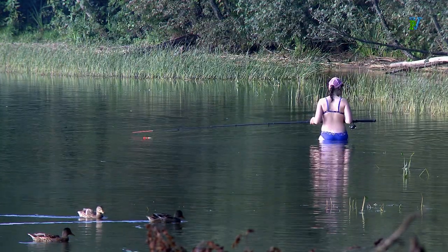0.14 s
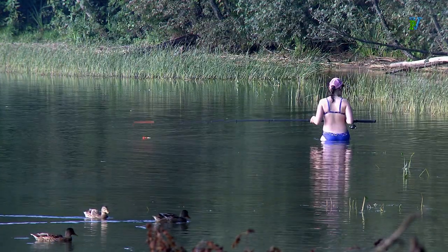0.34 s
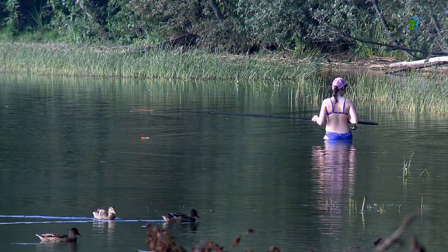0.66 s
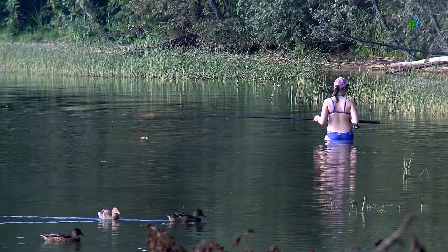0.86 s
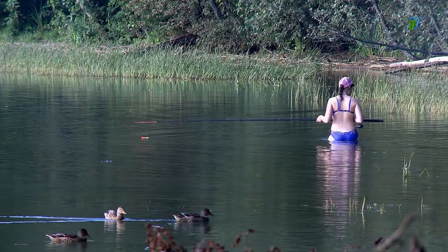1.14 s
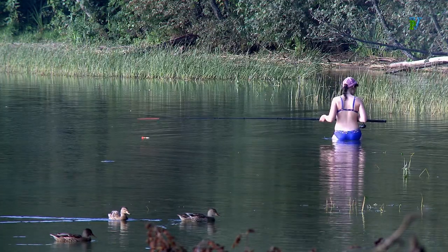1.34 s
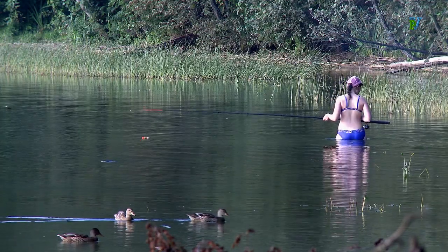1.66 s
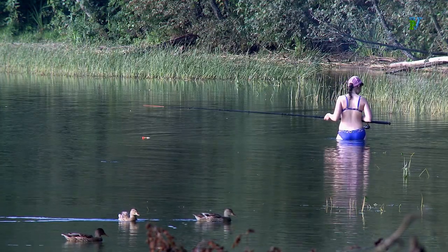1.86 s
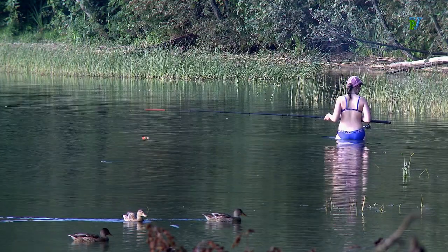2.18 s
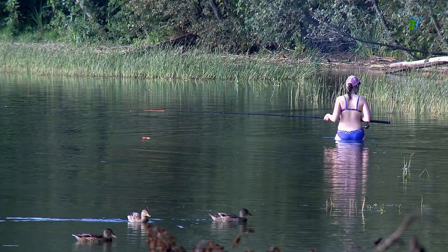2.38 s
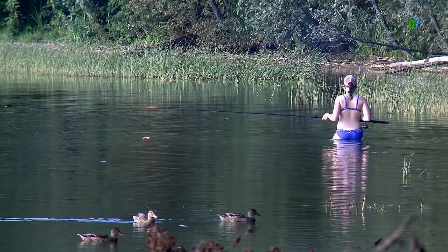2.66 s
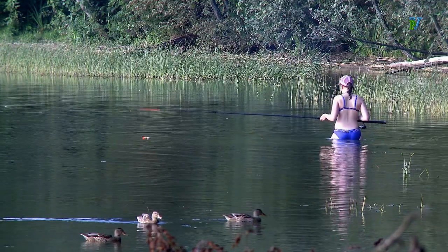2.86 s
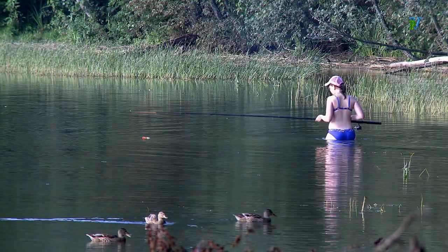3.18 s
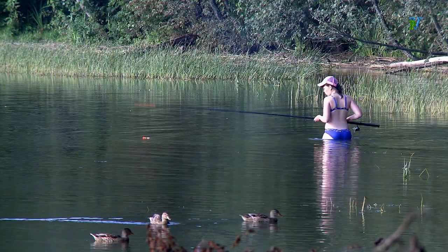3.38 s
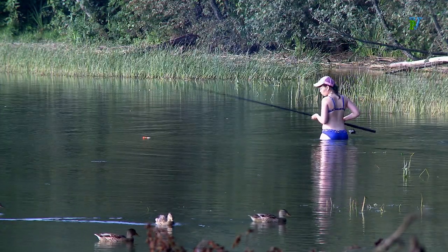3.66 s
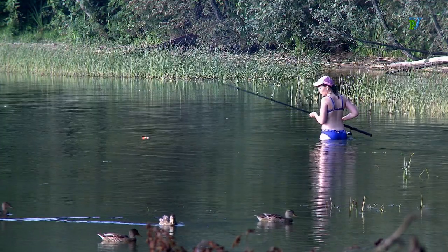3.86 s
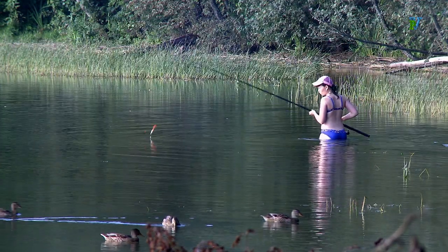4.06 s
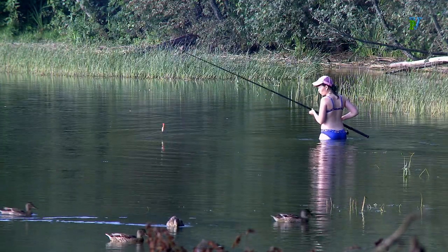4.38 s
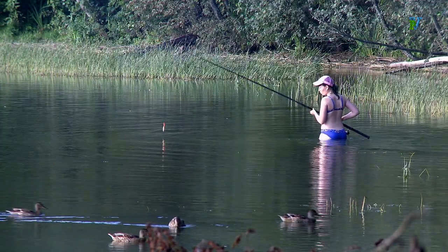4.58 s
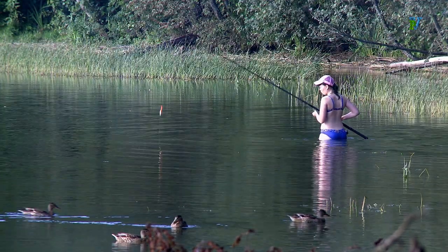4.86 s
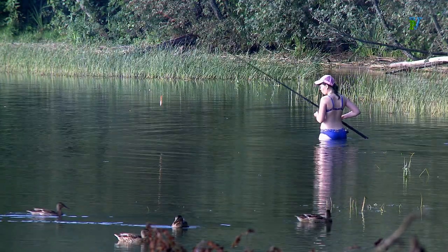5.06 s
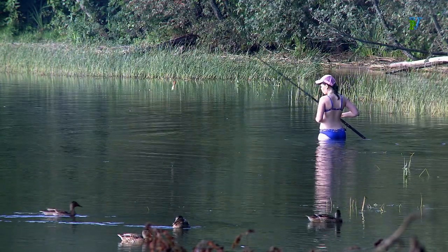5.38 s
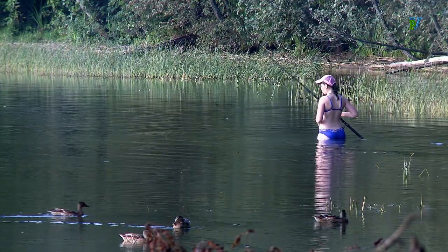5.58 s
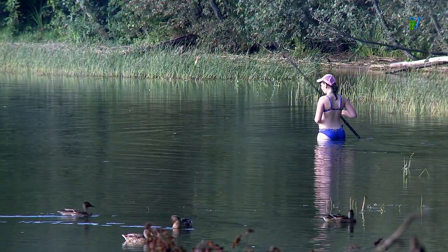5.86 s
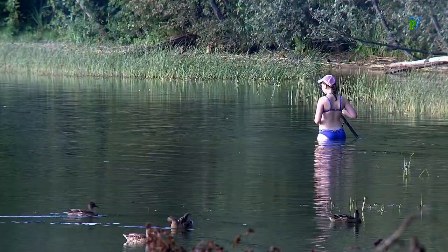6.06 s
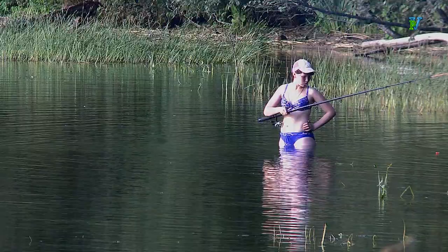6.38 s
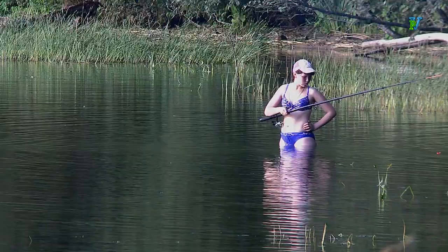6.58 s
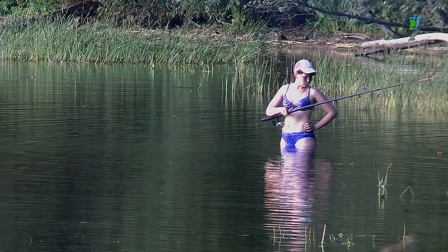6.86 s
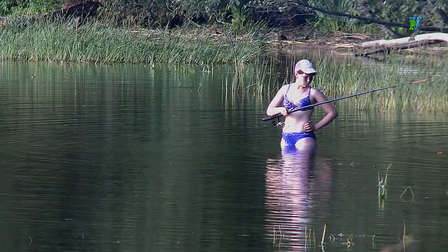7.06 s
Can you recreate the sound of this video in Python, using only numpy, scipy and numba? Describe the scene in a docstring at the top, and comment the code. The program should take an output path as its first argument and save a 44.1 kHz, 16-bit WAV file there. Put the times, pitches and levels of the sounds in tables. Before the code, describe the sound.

On a calm lake, a duck at far left gives seven short nasal quacks, roughly one every three quarters of a second, with faint echoes off the banks. Bush crickets sizzle very high, mostly left; wavelets gurgle quietly at the shore, a grasshopper ticks briefly, a fly buzzes faintly, and breeze rumbles on the stereo microphone. After the last quack only insects, leaves, water and gusts remain.

```python
"""A calm lake, heard from the shore on a two-port microphone: far to the left a mallard hen gives seven
nasal quacks, slaps of her membranes ringing in windpipe and throat, with a few echoes off the banks.
Bush crickets sizzle and a grasshopper ticks in bursts of noise; a fly buzzes by in puffs of air.
Wavelets gurgle at the bank as gliding bubbles over a soft wash; leaves and reeds hiss, and a light breeze
rumbles on the microphone ports."""
import sys
import numpy as np
from scipy import signal
from scipy.fft import rfft, irfft
from scipy.io import wavfile
from scipy.ndimage import uniform_filter1d
from numba import njit

SR = 44100
rng = np.random.default_rng(int(sys.argv[2]) if len(sys.argv) > 2 else 0)


def pcm_store(signal):
    """Save signal as 16-bit PCM."""
    levels = np.round(np.clip(np.atleast_2d(signal), -1, 1) * 32767)
    wavfile.write(sys.argv[1], SR, levels.astype(np.int16).T)


N = 318392
TIME = np.arange(N) / SR   # s

# In every spectrum below the dB are relative: the coloured sound is scaled to rms 1.
# Leaves and reeds along the shore. Each row: time in seconds, level in dB.
FOLIAGE_LEVEL = [(0, -66.5), (2, -66), (4, -66), (4.45, -64.5), (5, -66.5), (5.8, -66), (6.4, -63),
                 (7.22, -60.5)]
# Their hiss. Each row: frequency in Hz, relative level in dB.
FOLIAGE_SPECTRUM = [(50, 1.5), (150, 10), (350, 7), (800, 1), (1400, 0), (2100, -0.5), (3500, -1),
                    (4800, -6.5), (7500, -9.5), (11000, -4), (16000, -3)]

# The breeze between gusts. Each row: time in seconds, relative level in dB.
BREEZE_LEVEL = [(0, -61.5), (.38, -65), (.7, -60), (2.4, -56), (3.4, -53.5), (4.95, -55.5), (5.9, -54.5),
                (7.22, -59.5)]
# Gusts on the microphone. Each row: start in seconds, length in seconds, left and right relative level in dB.
MICROPHONE_GUSTS = [(0.465, 0.16, -56, -68), (0.928, 0.28, -53, -66), (1.48, 0.3, -55, -57),
                    (1.68, 0.15, -46, -53), (2.07, 0.41, -83, -55.5), (2.639, 0.19, -51.5, -54),
                    (2.836, 0.23, -41, -54), (3.018, 0.26, -45.5, -60), (3.837, .21, -45.5, -59),
                    (4.016, 0.46, -49.5, -70), (4.255, 0.59, -47.5, -57.5), (5.024, 0.43, -56.5, -54),
                    (6.033, 0.65, -50, -50), (6.605, 0.38, -41, -45), (6.91, .42, -50.5, -51)]
# Rumble of the large eddies. Each row: frequency in Hz, relative level in dB.
LARGE_EDDY_SPECTRUM = [(8, -13), (15, 10.5), (27, -1), (50, -3), (80, -9.5), (110, -19.5), (170, -28.5),
                       (280, -43), (500, -59), (900, -100)]
# Sound of the small eddies. Each row: frequency in Hz, relative level in dB.
SMALL_EDDY_SPECTRUM = [(40, -16), (90, 7.5), (170, -5.5), (280, -20), (500, -37.5), (1200, -53)]
GUST_RISE_S, GUST_FALL_S = 0.067, 0.094

# The larger bubbles at the bank. Each row: start in seconds, relative peak level in dB, starting pitch in Hz,
# length scale in seconds, rise in octaves per length, left over right in dB.
LARGE_BUBBLES = [(1.079, -67, 610, 0.068, .34, -24), (1.097, -60, 1420, .017, -.26, -14),
                 (1.257, -65, 574, 0.023, .23, 6), (1.671, -63, 2850, 0.011, -.16, -4),
                 (1.705, -58, 447, .047, 0.56, 7), (1.745, -65, 919, .035, .26, 13),
                 (1.772, -61, 2300, .012, .46, -4), (1.937, -61, 2780, .013, -.07, -5),
                 (2.334, -63.5, 2874, 0.007, -0.1, 3), (2.741, -63, 527, 0.03, 0.14, 7),
                 (3.081, -60, 991, 0.032, -0.36, 16), (3.128, -58, 913, 0.04, -.59, 13),
                 (3.245, -61.5, 438, 0.044, 0.87, 4), (4.273, -56.5, 497.4, 0.021, -0.13, 6),
                 (4.271, -58.5, 1310, .011, 0, 9), (4.475, -63, 1260, 0.032, 0.1, 14),
                 (4.675, -58.5, 570.4, 0.023, 0.28, 9), (5.365, -65.5, 720, .019, .15, 6),
                 (5.535, -62, 800, 0.045, 0.72, 16), (6.032, -58, 661, 0.012, -0.11, 10),
                 (6.062, -67, 940, 0.029, .79, 15), (6.202, -66, 425, 0.08, 0.35, 0)]
# Wavelets breaking on the bank. Each row: start in seconds, middle droplet level in dB (relative),
# length in seconds, middle droplet pitch in Hz.
BANK_WAVELETS = [(1.068, -78.5, 0.021, 1530), (1.57, -80, 0.097, 937), (2.667, -76, 0.032, 1410),
                 (4.422, -72.5, 0.03, 2030), (4.473, -72.5, 0.021, 1260), (4.526, -71.5, 0.063, 1920),
                 (5.831, -77, 0.054, 1520), (5.947, -77.5, 0.032, 1240), (6.021, -76, 0.022, 1400),
                 (6.163, -77, .025, 1900), (6.321, -79, 0.044, 1570), (7.028, -75.5, 0.012, 920)]
# Wash under the droplets. Each row: frequency in Hz, relative level in dB.
WATER_WASH_SPECTRUM = [(200, -14), (500, -10), (1400, -5.5), (3000, -7), (6000, -27), (14000, -21)]

# Far bush cricket, singing without pause. Each row: time in seconds, level in dB.
STEADY_CRICKET_LEVEL = [(0, -55.5), (1, -53.5), (2.2, -54), (2.6, -55), (4, -53.5), (4.7, -54.5),
                        (6.1, -53), (6.5, -49.5), (6.9, -48), (7.22, -47)]
# Bush cricket on the left, singing in bouts. Each row: start in seconds, end in seconds, relative level in dB.
LEFT_CRICKET_BOUTS = [(0.062, 1.32, -55.5), (1.501, 2.38, -54.5), (3.46, 4.254, -62), (5.098, 6.05, -57.5),
                      (6.05, 7.3, -64)]
# Shrill wing resonance of both. Each row: frequency in Hz, relative level in dB.
WING_SPECTRUM = [(5000, -51), (9000, -40), (10200, -21.5), (11800, -20), (12700, -15), (13550, -7),
                 (14200, -4), (14700, -11.5), (14830, 5.5), (15000, -2), (15280, -1), (15600, -1.5),
                 (16000, -3.5)]
STEADY_STROKES_PER_S, BOUT_STROKES_PER_S = 90.6, 98.1   # mean rates
BOUT_SWELL_S, BOUT_STOP_S = 0.15, 0.07

# Grasshopper phrases. Each row: start in seconds, number of strokes, seconds between strokes,
# relative peak level in dB.
GRASSHOPPER_PHRASES = [(3.5984, 5, 0.08, -60.3), (4.146, 5, .0766, -61.5), (6.997, 3, 0.0746, -56.5)]
# One tick. Each row: frequency in Hz, relative level in dB.
GRASSHOPPER_SPECTRUM = [(5000, -32), (6400, -8), (7300, -4), (9500, -4.5), (11600, 0.5), (13500, -11),
                        (16000, -67)]
FIRST_STROKE_DB = -6.5   # each phrase starts softly

# A fly swings faintly by. Each row: nearest at in seconds, half length in seconds, mean wingbeats per second,
# relative level in dB.
FLYBYS = [(4.049, 0.39, 177, -77.5), (4.705, 0.12, 185, -80), (5.489, 0.14, 174, -77.5),
          (5.759, .08, 200, -82)]
# Its buzz. Each row: frequency in Hz, relative level in dB.
BUZZ_SPECTRUM = [(180, 1.5), (370, 14), (550, 9), (900, 0), (1200, -3), (2500, -36), (6000, -51)]

# Echoes off the banks. Each row: delay in seconds, level in dB.
BANK_ECHOES = [(0.02, -22), (.043, -28.5), (.086, -28.5)]

# Quacks. Each row: start in seconds, length in seconds, relative level in dB, mean held pitch in Hz,
# seconds until the voice breaks upward, seconds until the bill is open, open throat in Hz,
# bill ring in Hz, ring in dB and rasp in dB (both relative to the voice).
DUCK_QUACKS = [(0.028, 0.16, -42.5, 183.2, 0.059, 0.039, 2040, 4770, -19.5, -22.5),
               (0.785, 0.15, -42.5, 184.3, 0.047, 0.041, 1968, 4900, -21.5, -17),
               (1.661, 0.12, -47, 169.2, 0.070, 0.065, 2110, 4950, -16.5, -18.5),
               (2.407, 0.151, -46, 166.8, 0.1, .048, 2070, 5180, -17, -18.5),
               (3.084, 0.17, -43, 187, 0.062, 0.031, 2028, 5000, -18.5, -19),
               (3.826, 0.152, -42, 189, 0.075, 0.033, 2053, 4910, -20, -22.5),
               (4.627, 0.16, -43.5, 185, 0.066, 0.049, 2084, 4770, -19, -21.5)]
# Windpipe resonances, which stay put. Each row: centre in Hz, width in Hz, relative level in dB.
WINDPIPE_RESONANCES = [(360, 680, -9.5), (840, 70, 0), (1200, 250, -6.5)]
# Throat resonances at the reference bill opening. Each row: centre in Hz, width in Hz, relative level in dB.
THROAT_RESONANCES = [(1954, 483, 13.5), (2350, 1120, 2.5)]
# Rasp on the voice. Each row: frequency in Hz, relative level in dB.
VOICE_RASP_SPECTRUM = [(1500, -31), (3000, -3.5), (4200, -0.5), (5300, -15), (6100, 0), (7600, -9),
                       (8800, -6.5), (11000, -17), (15000, -28)]
OPEN_BILL_HZ = 2008   # reference bill opening
FLUTTERS_PER_S = 170   # the throat colour flutters about as fast as the voice cycles
ATTACK_S, RELEASE_S = 0.01, 0.013
SWELL_DB, SWELL_S = 16.5, 0.034   # every quack starts this far down and swells
# the throat centre starts low and sags once the bill is open
SHUT_BILL_HZ, BILL_SAG_HZ_PER_S = 1430, 220
START_HZ, LOW_RISE_HZ_PER_S = 134.9, 280   # the hoarse low register
BREAK_S, HELD_RISE_HZ_PER_S = 0.00418, 60   # the jump to the high register, which still creeps upward

CUTOFF_HZ = 15850


def from_db(db):
    """Decibels to gain."""
    return 10 ** (np.asarray(db) / 20)


def rms_one(x):
    """Scale to unit rms."""
    return x / np.sqrt(np.mean(x ** 2) + 1e-20)


def evened(x):
    """Hold a pulsed sound near rms 1 over a few cycles."""
    power = uniform_filter1d(uniform_filter1d(x ** 2, size=600), size=400)
    return x / np.sqrt(np.abs(power) + 1e-12)


def in_time(rows):
    """Each column of a curve at every sample."""
    s, *columns = np.transpose(rows)
    return [np.interp(TIME, s, c) for c in columns]


def ramp(age, length, rise_s, fall_s):
    """Attack, hold and release, as a gain."""
    return np.clip(np.minimum(age / rise_s, (length - age) / fall_s), 0, 1)


def drift(rate):
    """Random wander: straight lines between normal draws of spread 1, rate draws per second."""
    knots = rng.standard_normal(4096)
    return np.interp(TIME * rate, np.arange(len(knots)), knots)


def panned(x, pan_db):
    """Place a sound by its left over right level, keeping its power."""
    ratio = from_db(pan_db)
    return np.array([x * ratio, x]) * np.sqrt(2 / (1 + ratio ** 2))


def coloured(x, spectrum):
    """Give a sound a spectrum, drawn on a log frequency axis; rms 1."""
    hz, db = np.transpose(spectrum)
    bins = np.maximum(np.fft.rfftfreq(N, 1 / SR), 1)
    gain = from_db(np.interp(np.log(bins), np.log(hz), db))
    return rms_one(irfft(rfft(x) * gain, N))


@njit
def resonate(x, hz, width, sr):
    """A resonance of about unit gain whose centre may move."""
    y, r = np.zeros(len(x)), np.exp(-np.pi * width / sr)
    for i in range(2, len(x)):
        drive = (1 - r * r) / 2 * (x[i] - x[i - 2])
        y[i] = drive + 2 * r * np.cos(2 * np.pi * hz[i] / sr) * y[i - 1] - r * r * y[i - 2]
    return y


def clicks(at, sizes):
    """Clicks at fractional sample positions, shared between the two nearest samples."""
    out, whole = np.zeros(N), np.clip(at.astype(int), 0, N - 2)
    np.add.at(out, whole, sizes * (1 - at % 1))
    np.add.at(out, whole + 1, sizes * (at % 1))
    return out


def cycle_positions(rate):
    """Sample positions at which a varying rate in Hz completes each cycle."""
    cycles = np.cumsum(rate) / SR
    return np.interp(np.arange(1, int(cycles[-1])), cycles, np.arange(N))


def foliage():
    """Leaves and reeds rustle as coloured noise, independent on each side."""
    return from_db(in_time(FOLIAGE_LEVEL)[0]) * coloured(rng.standard_normal((2, N)), FOLIAGE_SPECTRUM)


def breeze(gain_db=5.5, gust_db=-51.5, reference_db=-45.0, steepness=1.48, lean_db=1.0):
    """Eddies buffet each microphone port on its own; small eddies grow faster than large ones in a gust."""
    power = panned(from_db(in_time(BREEZE_LEVEL)[0]), pan_db=lean_db) ** 2
    for start, length, left_db, right_db in MICROPHONE_GUSTS:
        shape = ramp(TIME - start, length, GUST_RISE_S, GUST_FALL_S)
        power = power + (from_db([[left_db], [right_db]]) * shape) ** 2
    level_db = 10 * np.log10(power)
    large = coloured(rng.standard_normal((2, N)), LARGE_EDDY_SPECTRUM)
    large /= np.sqrt(uniform_filter1d(large ** 2, size=6000))   # even out the rumble
    small = coloured(rng.standard_normal((2, N)), SMALL_EDDY_SPECTRUM)
    small_db = gust_db + steepness * (level_db - reference_db)
    return from_db(level_db + gain_db) * large + from_db(small_db) * small


def bubbles(rows):
    """Each bubble swells, rings and glides in pitch as it nears the surface."""
    out = np.zeros((2, N))
    for s, db, hz, length, rise, pan_db in rows:
        start = max(int(s * SR), 0)
        age = TIME[:min(int(2 * length * SR), N - start)] / length   # in lengths
        phase = 2 * np.pi * np.cumsum(hz * 2 ** (rise * age)) / SR
        envelope = 6 * np.e * age * np.exp(-6 * age)   # peaks at 1 after a sixth of the length
        out[:, start:start + len(age)] += panned(from_db(db) * envelope * np.sin(phase), pan_db)
    return out


def wavelets(count=12, spread_db=15.0, cycles=9, octaves=2.1, wash_db=2.5):
    """Each wavelet sheds a handful of tiny bubbles of mixed size over a soft wash."""
    rows, wash = [], 0
    for start, level_db, length, middle_hz in BANK_WAVELETS:
        when, size, glide, strength = rng.random((count, 4)).T
        hz = middle_hz * 2 ** (octaves * (size - .5))
        droplet_db = level_db + spread_db * (2 * strength - 1)
        pan_db = np.full(count, 2.5)
        rows += zip(start + length * when, droplet_db, hz, cycles / hz, 0.41 * glide, pan_db)
        wash = wash + from_db(level_db + wash_db) * np.exp(-((TIME - start) / length - .5) ** 2)
    return bubbles(rows) + wash * coloured(rng.standard_normal((2, N)), WATER_WASH_SPECTRUM)


def bush_cricket(loudness, strokes_per_s, stroke_depth_db):
    """Each wing stroke scrapes a burst out of the shrill wing resonance."""
    phase = 2 * np.pi * np.cumsum(strokes_per_s * (1 + .005 * drift(4))) / SR
    strokes = from_db(stroke_depth_db * ((1 + np.cos(phase)) / 2) ** 7)   # the power narrows each burst
    return loudness * coloured(strokes * rng.standard_normal(N), WING_SPECTRUM)


def grasshopper(stroke_s=0.0048, gain_db=-4.0):
    """Phrases of short, evenly spaced leg strokes, each a bell-shaped burst of noise."""
    envelope = np.zeros(N)
    for start, count, period, db in GRASSHOPPER_PHRASES:
        for k in range(round(count)):
            stroke_db = db + FIRST_STROKE_DB * (k == 0)
            age = TIME - start - k * period
            envelope += from_db(stroke_db) * np.exp(-.5 * ((age - stroke_s) / stroke_s) ** 2)
    return from_db(gain_db) * envelope * coloured(rng.standard_normal(N), GRASSHOPPER_SPECTRUM)


def fly(waver=0.0057):
    """One puff of air for each wingbeat; the buzz swells and fades with each pass."""
    wingbeats = in_time(FLYBYS)[1]
    loudness = sum(from_db(db) / (1 + ((TIME - s) / half) ** 2) ** 2 for s, half, _, db in FLYBYS)
    at = cycle_positions(wingbeats * (1 + waver * drift(14)))
    puffs = clicks(at, 1) - len(at) / N   # without the steady part
    return loudness * coloured(puffs, BUZZ_SPECTRUM)


def lakeside(x, scatter_db=-27, t60=0.64):
    """A few echoes from the banks and a thin, decaying scatter from the trees."""
    t = TIME[:SR // 2]
    response = rng.standard_normal(len(t)) * from_db(-60 * t / t60)
    response *= from_db(scatter_db) / np.sqrt(np.sum(response ** 2))
    for delay, db in BANK_ECHOES:
        response[int(delay * SR)] += from_db(db)
    return signal.fftconvolve(x, response)[:N]


def quack_controls():
    """The voice swells, rises and breaks upward as the bill opens: every control at every sample."""
    rows = np.array(DUCK_QUACKS)
    nearest = np.searchsorted((rows[1:, 0] + rows[:-1, 0]) / 2, TIME)
    (start, length, top_db, held_hz, break_at, opens_s,
     open_hz, ring_hz, ring_db, rasp_db) = rows[nearest].T.copy()
    gate = ramp(TIME - start + ATTACK_S, length + ATTACK_S, ATTACK_S, RELEASE_S)
    age = np.clip(TIME - start, 0, length)
    level_db = top_db - SWELL_DB * np.exp(-age / SWELL_S) + 20 * np.log10(gate + 1e-9)
    low = START_HZ + LOW_RISE_HZ_PER_S * age
    high = held_hz + HELD_RISE_HZ_PER_S * (age - (break_at + length) / 2)   # held_hz is reached mid-hold
    pitch = low + (high - low) / (1 + np.exp((break_at - age) / BREAK_S))
    opened = np.minimum(age / opens_s, 1)
    sag = BILL_SAG_HZ_PER_S * (age - length / 2)
    centre = SHUT_BILL_HZ + opened * (open_hz - SHUT_BILL_HZ - sag)
    return level_db, pitch, centre, ring_hz, ring_db, rasp_db


def syrinx(pitch, second_lag_s=0.002267, second_db=-3.5):
    """The membranes slap twice a cycle, the second weaker and less even; each lets out a puff of air."""
    at = cycle_positions(pitch)
    # roughness against pitch in Hz: hoarse on the climb, clearest once held high
    rough = np.interp(pitch, [135, 155, 166, 178, 185], [.65, .9, .7, .8, .5])
    chance = rng.standard_normal((2000, 4))[:len(at)] * rough[at.astype(int), None]
    # lateness in seconds and loudness in dB, for the first and second slap
    late, louder, second_late, second_louder = (chance * [.00005, 2.0, .00018, 4.0]).T
    first = clicks(at + SR * late, from_db(louder))
    second = clicks(at + SR * (second_lag_s + second_late), from_db(second_db + second_louder))
    slaps = first + second
    puff_envelope = signal.lfilter([1], [1, -np.exp(-1 / (.0013 * SR))], slaps)   # dies away over 1.3 ms
    puffs = puff_envelope * rng.standard_normal(N)
    return slaps + .08 * rough * puffs, puffs


def duck(throat_band_hz=2200, gain_db=-4.0, edge_per_db=0.3, full_db=-52.0, sweep=1.0,
         waver=.012, wavers_per_s=60, flutter=.04):
    """Slaps ring in windpipe and throat, which brightens as the bill opens; effort adds a raspy edge."""
    level_db, pitch, centre, ring_hz, ring_db, rasp_db = quack_controls()
    opening = (centre / OPEN_BILL_HZ) ** sweep * (1 + flutter * drift(FLUTTERS_PER_S))
    slaps, puffs = syrinx(pitch * (1 + waver * drift(wavers_per_s)))
    # neighbouring resonances alternate in sign
    voice = np.zeros(N)
    for k, (hz, width, db) in enumerate(THROAT_RESONANCES):
        voice += from_db(db) * (-1) ** k * resonate(slaps, hz * opening, width, SR)
    voice = resonate(voice, OPEN_BILL_HZ * opening, throat_band_hz, SR)   # the mouth steepens the flanks
    for k, (hz, width, db) in enumerate(WINDPIPE_RESONANCES):
        voice += from_db(db) * (-1) ** (k + 1) * resonate(slaps, np.full(N, float(hz)), width, SR)
    voice = signal.sosfilt(signal.butter(5, 3250, fs=SR, output="sos"), voice)
    ring = resonate(resonate(slaps, ring_hz, 610.0, SR), ring_hz, 4100.0, SR)
    rasp = coloured(puffs, VOICE_RASP_SPECTRUM)
    edge = from_db(ring_db) * rms_one(ring) + from_db(rasp_db) * rasp
    effort = from_db(edge_per_db * (level_db - full_db))
    return from_db(level_db + gain_db) * (evened(voice) + effort * edge)


def scene():
    """Foliage, breeze, water and insects behind the duck far to the left."""
    background = foliage() + breeze()
    water = from_db(-1.0) * bubbles(LARGE_BUBBLES) + wavelets()
    steady = from_db(in_time(STEADY_CRICKET_LEVEL)[0])
    bouts = np.zeros(N)
    for start, end, db in LEFT_CRICKET_BOUTS:
        bouts += from_db(db) * ramp(TIME - start, end - start, BOUT_SWELL_S, BOUT_STOP_S)
    insects = panned(bush_cricket(steady, STEADY_STROKES_PER_S, stroke_depth_db=8.5), pan_db=5.5)
    insects += panned(bush_cricket(bouts, BOUT_STROKES_PER_S, stroke_depth_db=11), pan_db=16)
    insects += panned(grasshopper(), pan_db=-8) + panned(fly(), pan_db=-10)
    quacks = duck()
    bird = panned(quacks, pan_db=55) + panned(lakeside(quacks), pan_db=38)
    return background + water + insects + bird


def record(dry):
    """The top is cut steeply above the cutoff."""
    return signal.sosfilt(signal.ellip(12, .2, 80, CUTOFF_HZ, fs=SR, output="sos"), dry)


dry = scene()
out = record(dry)
pcm_store(out)
```